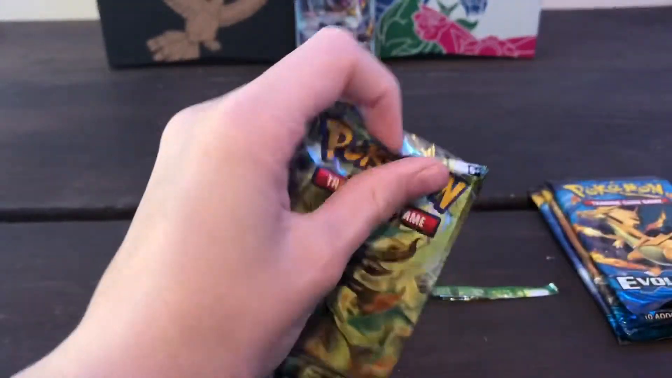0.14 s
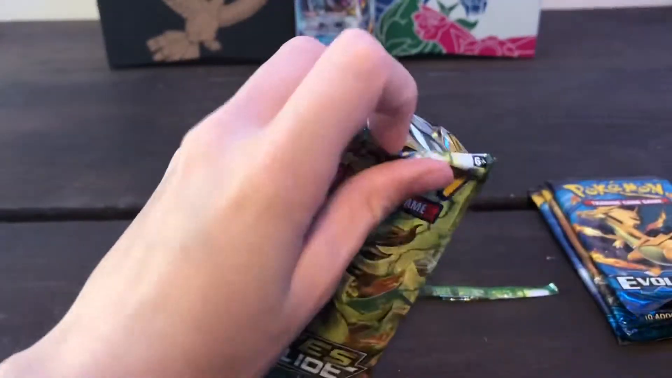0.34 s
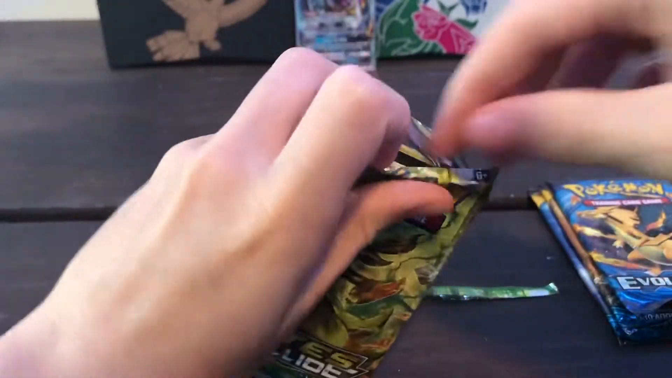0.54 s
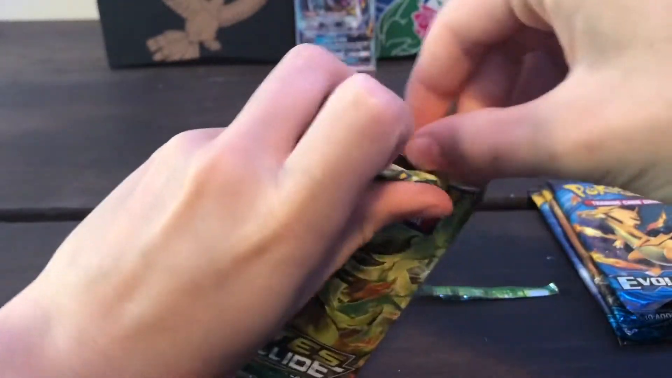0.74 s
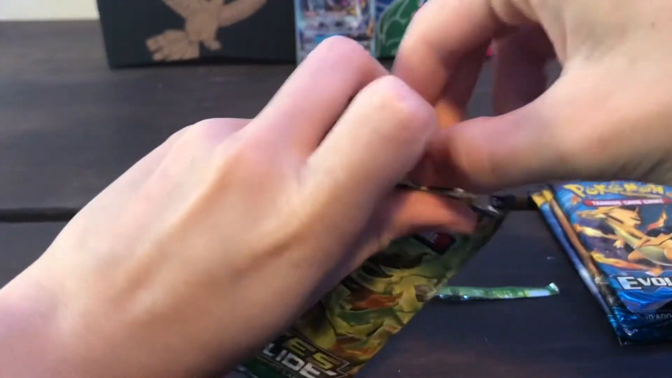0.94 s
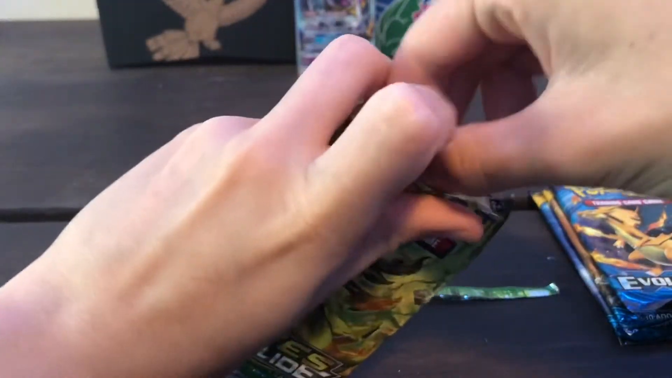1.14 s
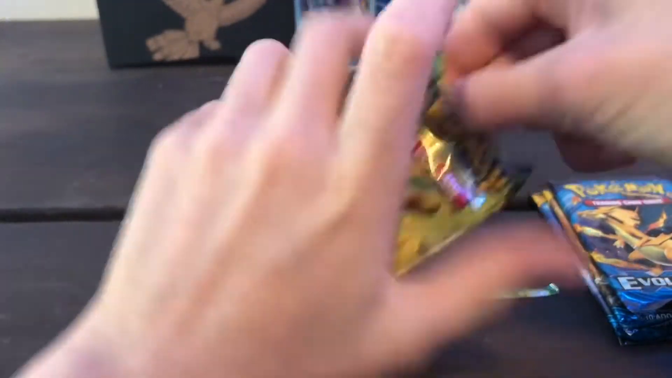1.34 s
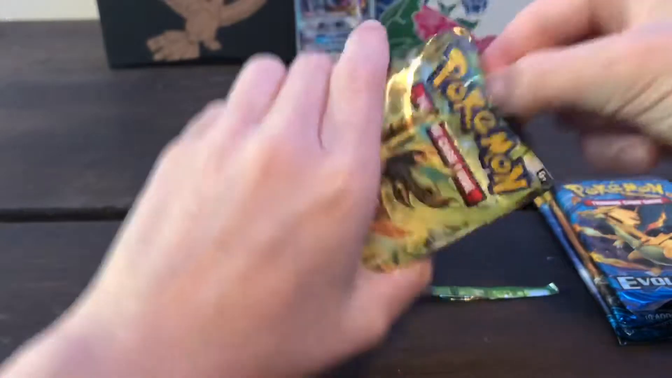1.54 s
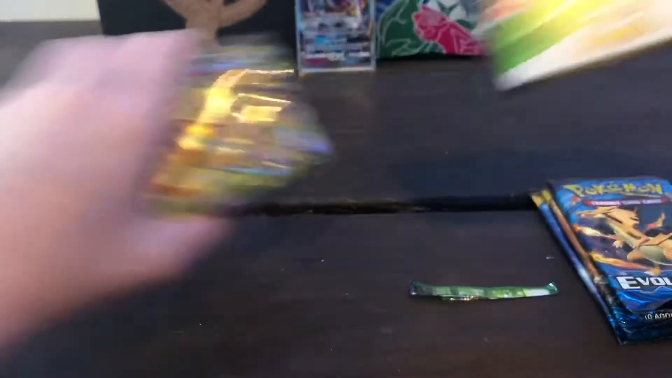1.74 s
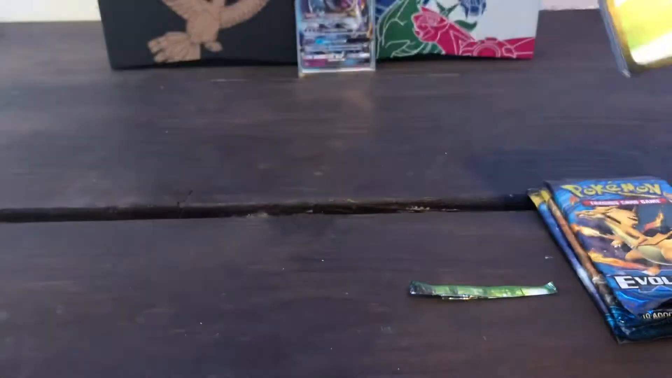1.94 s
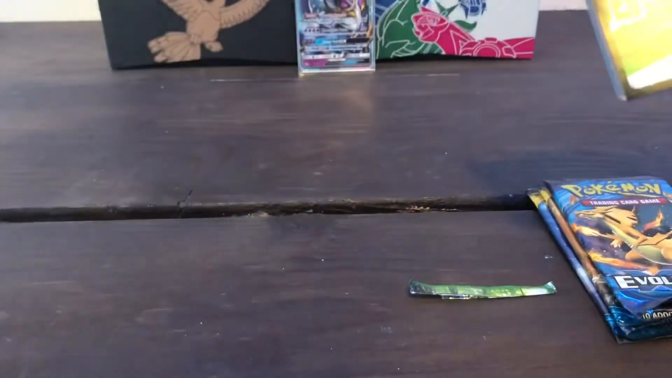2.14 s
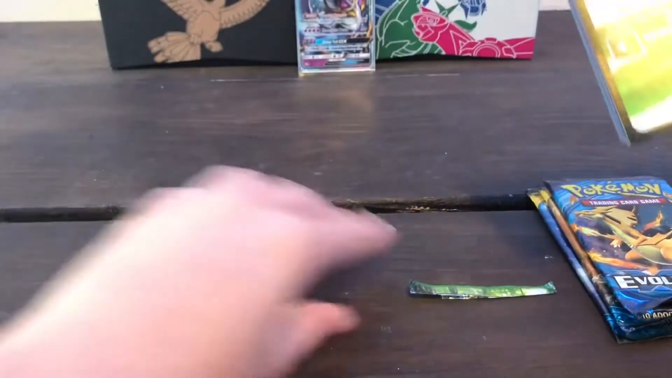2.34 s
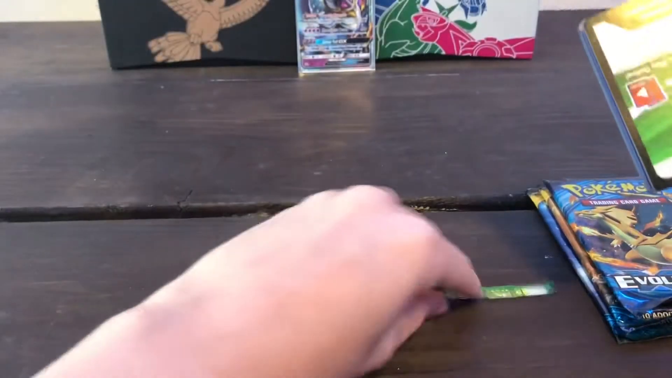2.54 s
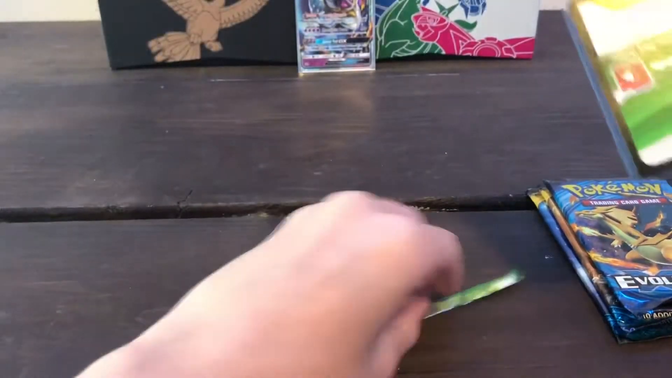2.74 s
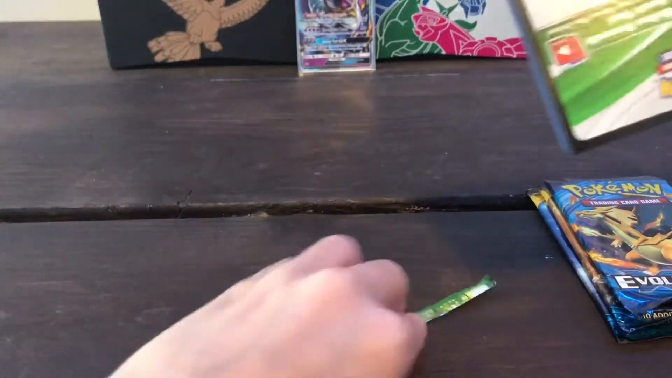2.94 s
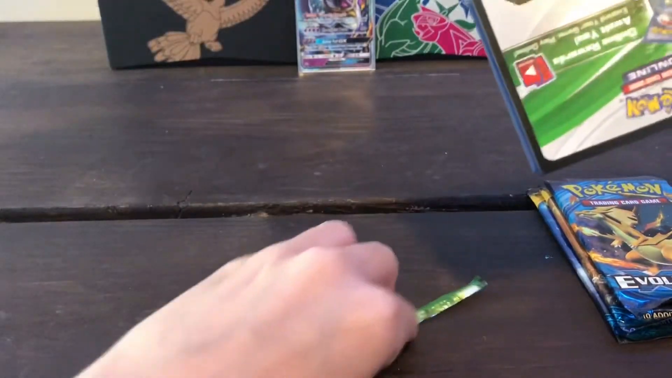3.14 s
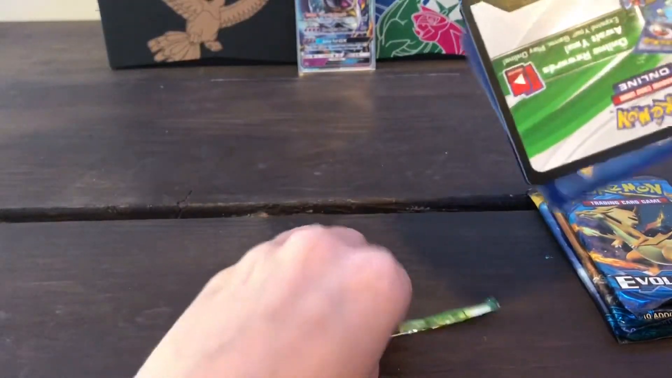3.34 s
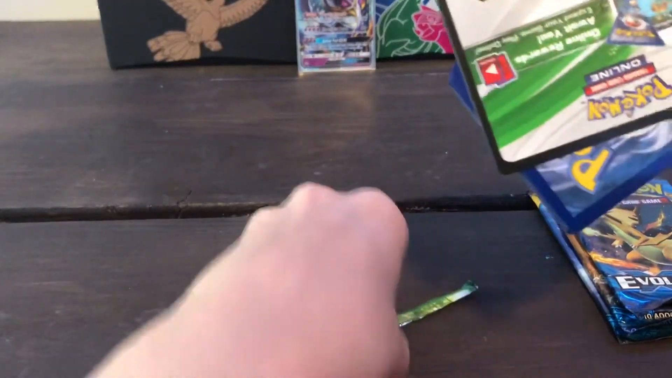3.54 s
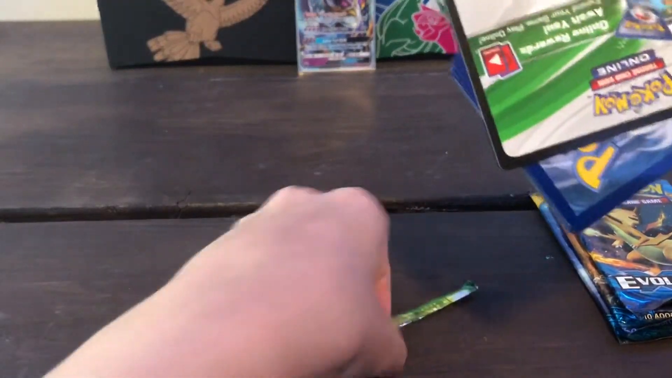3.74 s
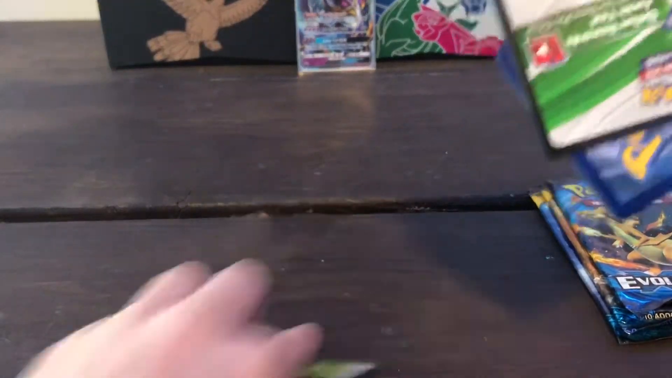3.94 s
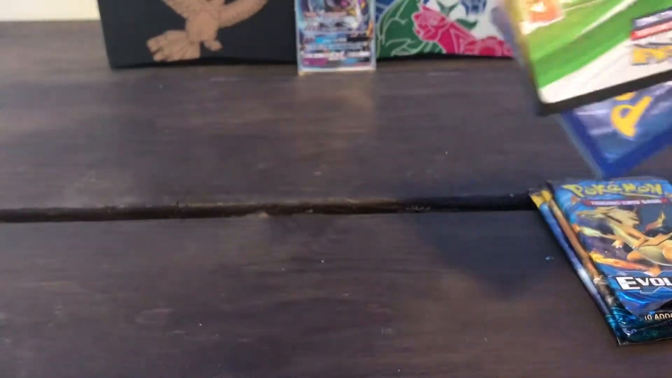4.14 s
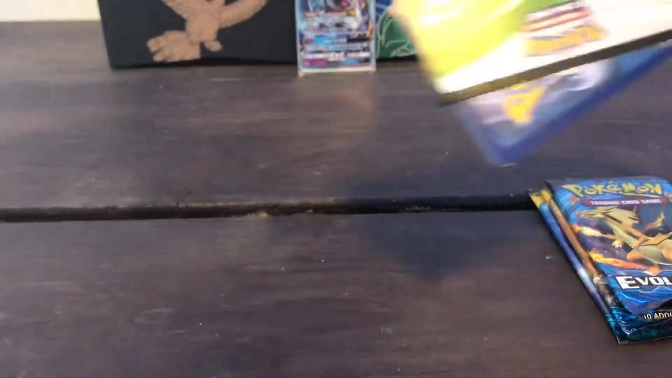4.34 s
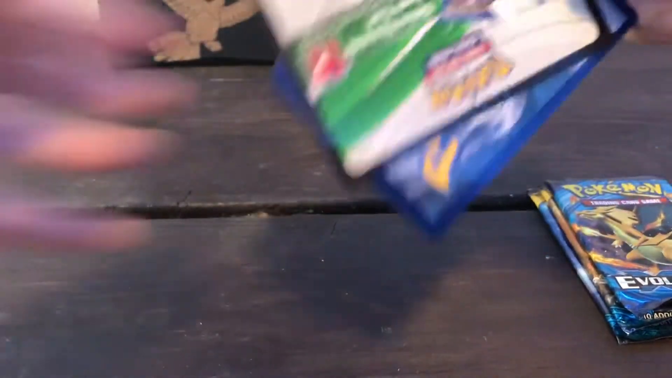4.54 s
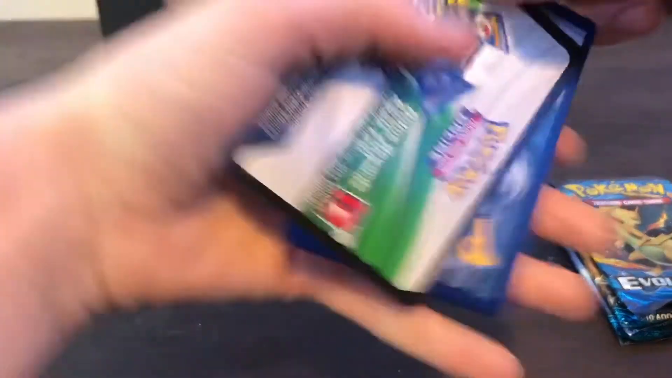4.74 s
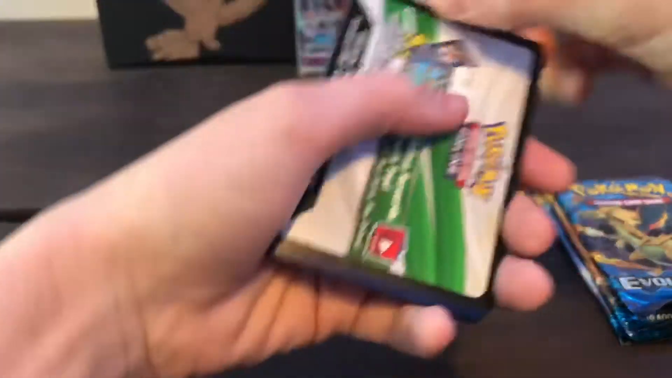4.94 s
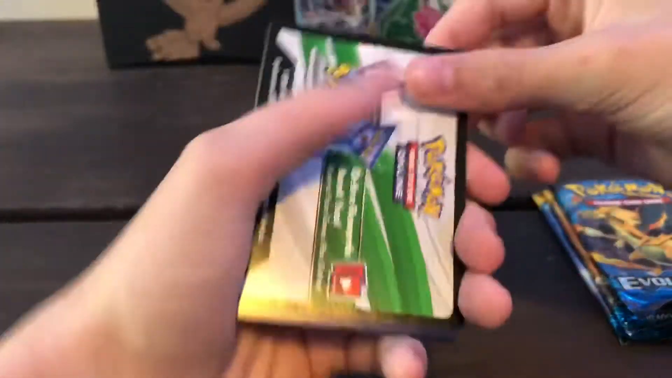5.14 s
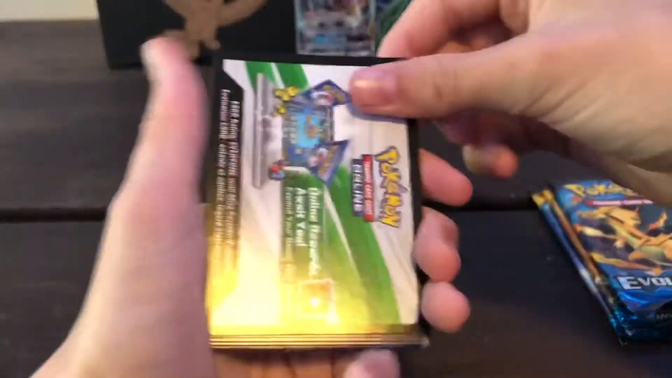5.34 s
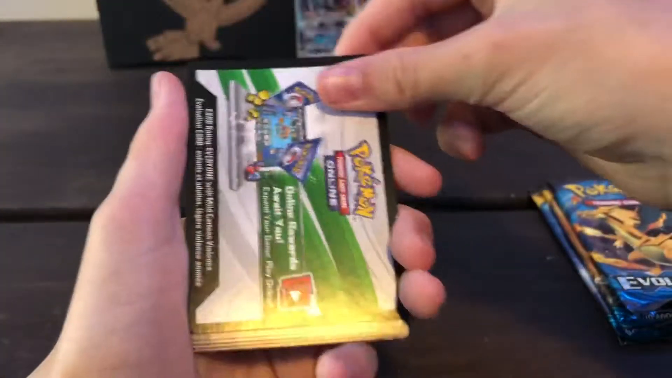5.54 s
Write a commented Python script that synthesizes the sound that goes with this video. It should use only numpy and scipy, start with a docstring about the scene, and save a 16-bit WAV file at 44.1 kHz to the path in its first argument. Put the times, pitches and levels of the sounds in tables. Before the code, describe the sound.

Hands crinkle and tear a crisp foil wrapper over a wooden table in sharp crackling bursts, then quieter rustles and small card slides.

```python
"""Foil wrapper torn over a table

Hands crinkle and tear a foil card wrapper over a wooden table in a quiet room, then handle strip and cards.
Creases snap one by one as short ringing noise bursts, over a rustle of tiny slips made of clicked grains.
Hands and cards knock and scrape the table, whose modes ring low; soft bumps shake the stand.
The loudest snaps clip the converter."""
import sys
import numpy as np
from scipy import signal
from scipy.fft import rfft, irfft
from scipy.io import wavfile
from scipy.ndimage import uniform_filter1d

SR = 44100
rng = np.random.default_rng(int(sys.argv[2]) if len(sys.argv) > 2 else 0)


def transcribe(signal):
    """Save signal, clipped to [-1, 1], as a 16-bit WAV file at the path in sys.argv[1]."""
    frames = np.atleast_2d(signal).T
    limited = np.clip(frames, -1, 1)
    pcm = np.round(limited * 32767).astype(np.int16)
    wavfile.write(sys.argv[1], SR, pcm)


def volts_from_decibels(level):
    """Turn decibel levels (scalar or array-like) into linear amplitude factors."""
    exponent = np.asarray(level, float) / 20
    return 10 ** exponent


N = 246078


def evened(x):
    """Scales each row to rms 1."""
    return x / np.sqrt(np.mean(x ** 2, -1, keepdims=True) + 1e-20)


def read(points, hz):
    """Reads a curve on a log-frequency axis."""
    f, value = np.transpose(points)
    return np.interp(np.log(hz + 1), np.log(f + 1), value)


def add(mix, s, sound):
    """Mixes a sound in at s seconds."""
    part = mix[max(round(s * SR), 0):][:len(sound)]
    part += sound[:len(part)]


def clicks(per_s, spread_db):
    """A random train of signed clicks; a few are large."""
    chance = rng.random(N)
    size = np.minimum(rng.exponential(1, N), 4.5)
    sign = rng.choice([-1., 1.], N)
    return volts_from_decibels(spread_db * size) * (chance < per_s / SR) * sign


def strokes(rows, linger=0):
    """Strokes rise to a peak and fall away: summed level [dB], then colours [dB] weighted by power."""
    stroke_db, bend = 20, 1.203  # drop over one rise or fall time; bend above 1: round top, firm stop
    s, db, rise_s, fall_s, *colours = np.transpose(rows)[:, :, None]
    t = np.arange(0, N + 64, 64) / SR
    before = (s - t) / np.maximum(rise_s, .003)
    after = (t - s) / np.maximum(fall_s, .003)
    under = np.where(t < s, before, after)
    drop_db = stroke_db * (1 - linger * (t > s)) * under ** bend
    power = volts_from_decibels(db - drop_db) ** 2 + 1e-12
    total = power.sum(0)
    curves = [10 * np.log10(total)] + [(power * c).sum(0) / total for c in colours]
    return [np.interp(np.arange(N) / SR, t, c) for c in curves]


# room tone spectrum: (frequency [Hz], relative density [dB per Hz])
AIR_SPECTRUM = [(18, -42), (30, 2), (165, -3.5), (233, -4), (345, -6), (404, -8.5), (866, -14.5),
                (1350, -18), (1460, -16), (1910, -21.5), (2680, -22.5), (3980, -24), (16000, -31)]
AIR_RMS_DB = -54


def air():
    """Room tone and microphone hiss: shaped noise that wavers slowly, most in the bass."""
    frames, hz = N // 256 + 5, np.fft.rfftfreq(1024, 1 / SR)
    real, imag, patches = rng.standard_normal((frames, 513, 3)).T
    patches = uniform_filter1d(patches, 8, 0)
    patches = evened(uniform_filter1d(patches, 14, 1))
    waver_db = .6 + 2.5 / (1 + hz / 300)
    level_db = read(AIR_SPECTRUM, hz)[:, None] + waver_db[:, None] * patches
    noise = signal.istft((real + 1j * imag) * volts_from_decibels(level_db), nperseg=1024, noverlap=768)[1]
    return volts_from_decibels(AIR_RMS_DB) * evened(noise[:N])


# reverberation: (frequency [Hz], t60 [s])
ROOM_T60 = [(250, 0.36), (660, 0.2), (1740, 0.35), (4590, 0.15), (12100, 0.25)]
# table top and boxes behind: (delay [s], level [dB])
EARLY_ECHOES = [(.0031, -20), (.0058, -23.5), (.0095, -26.5), (.014, -40)]


def room(x):
    """A few early echoes, plus sparse taps of random sign dying band by band."""
    taps = np.zeros(SR // 2)
    at = np.arange(300, len(taps) - 20, 20)
    taps[at + rng.integers(0, 20, len(at))] = rng.choice([-1., 1.], len(at))
    hz, t, z = signal.stft(taps, SR, nperseg=128)
    decay = volts_from_decibels(-60 * t / read(ROOM_T60, hz)[:, None])
    tail = signal.istft(z * decay, SR, nperseg=128)[1]
    tail *= volts_from_decibels(-18) / np.linalg.norm(tail)
    for s, db in EARLY_ECHOES:
        add(tail, s, volts_from_decibels(np.array([db])))
    return signal.oaconvolve(x, tail)[:N]


# wrists and arms shaking the stand: (time [s], relative level [dB])
BUMPS = [(0.192, -40), (1.13, -49), (1.421, -53), (1.531, -53.5), (1.661, -41), (1.767, -35), (2.512, -43),
         (2.594, -57), (2.821, -49), (3.55, -48), (4.111, -41), (4.727, -47), (5.232, -52)]


def thuds():
    """Soft bumps: a couple of slow cycles that swell, sag in pitch and fade."""
    out, t = np.zeros(N), np.arange(SR // 8) / SR
    swell_s = .013
    for (s, db), (bend, phase) in zip(BUMPS, rng.random((len(BUMPS), 2))):
        turns = (70 + 25 * bend) * t * (1 - 4.4 * t)
        swell = t / swell_s * np.exp(1 - t / swell_s)
        add(out, s - .017, volts_from_decibels(db + 7.0) * swell * np.sin(2 * np.pi * (turns + phase)))
    return out


# modes of the wooden top: (frequency [Hz], relative level [dB], t60 [s])
TABLE_MODES = [(104.5, -10.5, 0.41), (139.5, -1, 0.28), (235, -2, 0.11), (187.5, -7, 0.082),
               (265.4, -4, 0.13), (291, -1.5, 0.069), (361.6, -4, .09), (398, -6.5, 0.091),
               (437.3, -1.5, 0.12), (488, -7.5, 0.24), (541.6, -5, 0.12), (612, -8.5, 0.11),
               (706, -13, 0.15), (800, -1.5, 0.079), (880, -7.5, 0.049), (973, -5.5, 0.093),
               (1086, -11, 0.14), (1170, -12, 0.073), (1329, -11, 0.08)]
# hands and cards meeting the table:
# (time [s], relative level [dB], upper modes over lower [dB], mode nearest the spot [Hz])
TABLE_KNOCKS = [(0.003, -24.5, 29.5, 1080), (0.127, -11, 8.5, 700), (0.139, -12, -6, 235),
                (0.195, -17, 11, 440), (0.205, -15, -3, 790), (0.769, -38, 24, 850), (1.058, -28, 15, 1170),
                (1.157, -25.5, 21, 800), (1.481, -27.5, 4, 880), (1.615, -20.5, -22, 1180),
                (1.633, -22.5, -3, 845), (1.707, -26.5, -1, 468), (2.007, -26, 11, 974),
                (2.051, -21, 18, 1020), (2.069, -25, 20.5, 1130), (2.306, -27.5, 0.5, 263),
                (2.509, -28.5, -10, 290), (2.897, -34, -2, 291), (3.02, -44.5, 12.5, 973),
                (3.472, -28, 2.5, 960), (3.536, -23.5, 0, 259), (4.044, -31, -23, 290),
                (4.094, -29.5, -21, 238.4), (4.104, -30, -28, 120), (4.707, -28.5, -4, 226)]
# hands sliding and leaning on the table:
# (peak time [s], relative level [dB], rise [s], fall [s], deepest modes over the rest [dB])
TABLE_SLIDES = [(0, -18.5, .01, 0.13, 11), (.138, -18, .03, .15, -24), (.206, -19, 0.13, 0.13, 14),
                (.449, -27.5, .013, 0.012, 1), (.549, -40, .04, 0.32, -5), (.892, -39.5, 0.59, 0.054, -11),
                (1.006, -38.5, .02, 0.22, -24), (1.16, -32, .1, 0.11, -43),
                (1.225, -32.5, 0.092, 0.033, -32), (1.317, -52, .055, 0.052, -17),
                (1.483, -38, .05, .4, -27), (1.616, -22.5, .09, 0.028, -5), (1.74, -40.5, .08, 0.71, -1),
                (1.91, -44, .2, 0.042, -7), (2.011, -49, .028, 0.043, 11),
                (2.072, -25.5, 0.061, 0.081, -23), (2.313, -36, 0.017, 0.6, -3.5),
                (2.524, -41.5, 0.11, 0.08, -1), (2.78, -39, 0.12, 0.23, -2), (2.899, -40.5, .03, 0.067, -9),
                (3.064, -33.5, 0.071, 0.095, 2.5), (3.259, -38.5, 0.16, 0.081, -1),
                (3.412, -39, 0.022, 0.39, 11), (3.542, -38, 0.096, 0.049, 11),
                (3.777, -36, 0.092, 0.2, -8.5), (4.101, -39.5, 0.2, .09, 1.3),
                (4.712, -44, 0.026, 0.016, -20), (4.873, -42, 0.046, .016, -20.5),
                (5.005, -50, 0.11, 0.045, 5)]


def table():
    """Soft knocks and a gritty scrape drive the same modes of the wooden top."""
    t, out = np.arange(SR // 2) / SR, np.zeros(N)
    scrape_db, deep_db = strokes(TABLE_SLIDES)
    spot = rng.standard_normal((len(TABLE_KNOCKS), len(TABLE_MODES)))  # each blow lands elsewhere
    flesh = signal.windows.hann(22)  # skin spreads the contact over half a millisecond
    for k, (hz, db, t60) in enumerate(TABLE_MODES):
        mode = volts_from_decibels(db - 60 * t / t60) * np.sin(2 * np.pi * hz * t)
        upper = 1 / (1 + (600 / hz) ** 4)
        deep = 1 / (1 + (hz / 180) ** 6)
        drive = volts_from_decibels(scrape_db + deep * deep_db - 36.0) * evened(clicks(700, spread_db=2))
        side = (-1) ** k  # neighbouring modes start in opposite directions
        for (at, blow_db, upper_db, spot_hz), luck in zip(TABLE_KNOCKS, spot[:, k]):
            near_db = 9 * np.exp(-(np.log(hz / spot_hz) / .09) ** 2)
            tilt_db = 1.38 * upper * upper_db - 0.65 * max(upper_db, 0)
            strength = volts_from_decibels(blow_db + near_db - 10 + tilt_db + 2.9 * luck)
            add(drive, at - .0015, side * strength * flesh / flesh.sum())
        out += signal.oaconvolve(drive, mode)[:N]
    # little sounds below the lowest mode
    return signal.sosfilt(signal.butter(2, 95, "high", fs=SR, output="sos"), out)


# fingers rubbing foil and card: (peak time [s], relative level [dB], rise [s], fall [s],
# treble over middle [dB], low over middle [dB])
FINGER_RUBS = [(0, -25.5, 0.011, 0.079, -5, 0), (.11, -25.5, 0.12, 0.1, -3, -16),
               (.15, -27, 0.058, 0.12, -5.5, 10.5), (.32, -58, .15, 0.19, 4, 2),
               (.453, -38.5, 0.019, 0.092, 1, -21), (.527, -35, 0.034, 0.097, -6, -5),
               (.63, -37, 0.074, 0.13, -2, 0.5), (.746, -33, 0.18, 0.3, -9.5, -9),
               (.905, -37, 0.21, 0.23, -10, -6), (1.07, -30.5, 0.054, 0.29, -3, -2.5),
               (1.165, -16, 0.037, 0.054, -7.5, -5), (1.231, -34.5, 0.042, 0.099, 4, -9),
               (1.327, -25.5, 0.012, 0.085, -5, -1.5), (1.503, -25, 0.099, 0.1, 0.5, -5.5),
               (1.58, -25.5, 0.04, 0.12, 6, -1), (1.635, -25.5, 0.13, 0.032, 2.5, -2),
               (1.72, -37.5, .04, 0.26, -5, 1), (1.924, -34.5, .1, 0.099, -14, -5.5),
               (2.015, -32, 0.013, 0.053, -3, 2), (2.06, -37, 0.038, 0.096, -8.5, 4),
               (2.306, -48, .006, 0.19, -10.5, 10), (2.522, -42, .05, 0.047, -5.5, -2.5),
               (2.6, -56.5, 0.1, .08, 0, 5), (2.681, -36, 0.036, .05, -1.5, -3),
               (2.77, -36.5, .04, 0.095, 2, 1), (2.8, -33.5, 0.06, 0.018, 3, -15),
               (2.84, -50, .04, 0.22, 9, 9), (3.095, -37.5, 0.077, 0.044, -11.5, -6.5),
               (3.22, -39, 0.024, 0.063, 2.1, -0.5), (3.34, -52.5, 0.098, 0.22, -3, 3),
               (3.476, -53.5, 0.023, 0.043, -19, 26), (3.53, -46, 0.035, 0.052, -12, 10.5),
               (3.68, -62, .05, .05, -7, 9.5), (3.77, -39.5, 0.045, 0.19, 1.5, -2.5),
               (3.85, -40.5, 0.16, 0.13, 2.1, -2.5), (3.965, -22.5, 0.082, .09, 8.5, -3),
               (4.035, -29, .07, 0.13, 10, -1), (4.099, -30, 0.044, 0.075, -9, -19),
               (4.657, -38.5, 0.021, 0.036, -6.5, -6), (4.708, -31.5, 0.013, 0.054, -12, -2),
               (4.745, -27, 0.042, 0.037, 1, -15.5), (4.89, -55, 0.14, 0.038, -4, -3),
               (5.03, -52, 0.042, 0.029, -3.5, -12), (5.32, -65.5, 0.24, .05, -2.5, -9.5),
               (5.55, -47, 0.025, 0.14, 3, 2)]
# wrapper: (frequency [Hz], relative density [dB per Hz])
FOIL_SPECTRUM = [(290, -36), (500, -23.5), (795, -3), (1460, -9), (1770, -1), (1930, -15), (2160, -3),
                 (4150, -9.5), (4530, -3), (16000, -16)]
# torn strip dragged over wood: (frequency [Hz], relative density [dB per Hz])
STRIP_SPECTRUM = [(290, -55), (500, -44), (1020, -18.5), (1840, -10.5), (2070, -14.5), (3650, -9),
                  (5390, -6), (9630, -13), (15100, -9), (16000, 0)]
# glossy cards sliding on each other: (frequency [Hz], relative density [dB per Hz])
CARDS_SPECTRUM = [(290, -57), (500, -31.5), (1480, -12.5), (1720, -20.5), (2540, -4), (3750, -9.5),
                  (5240, -2.5), (8700, -10), (11300, -9), (16000, -5)]
STRIP_FROM_S, CARDS_FROM_S = 2.28, 4.4
RUSTLE_HZ = (1310, 4262, 10900)  # centres of low, middle and treble


def rustle():
    """Thousands of tiny slips a second, each a few cycles at its own pitch, coming in clumps."""
    treble_hurry, low_linger = .25, .2  # shares of the fall: treble drops faster, lows slower
    t = np.arange(N) / SR
    rub_db, treble_db, low_db = strokes(FINGER_RUBS)
    treble_db = treble_db + strokes(FINGER_RUBS, -treble_hurry)[0] - rub_db
    low_db = low_db + strokes(FINGER_RUBS, low_linger)[0] - rub_db
    held = np.searchsorted([STRIP_FROM_S, CARDS_FROM_S], t)  # which thing is in the hands
    clump = volts_from_decibels(2.5 * evened(uniform_filter1d(rng.standard_normal(N), 130)))  # slips set each other off
    out = np.zeros(N)
    for hz in np.geomspace(600, 15600, num=40):
        place = np.interp(np.log(hz), np.log(RUSTLE_HZ), [-1, 0, 1])
        lean_db = place * treble_db if place > 0 else -place * low_db
        colour_db = []
        for thing in (FOIL_SPECTRUM, STRIP_SPECTRUM, CARDS_SPECTRUM):
            trend_db = np.interp(place, [-1, 0, 1], read(thing, np.array(RUSTLE_HZ)))
            colour_db.append(read(thing, hz) - trend_db)
        turns = np.arange(int(30 * SR / hz)) * hz / SR
        grain = np.sin(2 * np.pi * turns) * turns * np.exp(-turns / 2.8)
        train = clicks(.15 * hz * clump / clump.mean(), spread_db=2.5)
        slips = evened(signal.oaconvolve(train, grain)[:N])
        width_db = 1.78 * np.log2(hz / 4500)  # higher grains span more Hz
        out += volts_from_decibels(rub_db + lean_db + np.array(colour_db)[held] + width_db - 14.5) * slips
    return out


def small_creases():
    """Random rows like the listed snaps, with level and treble following the rubbing at that moment."""
    count, over_rub_db, spread_db, mean_t60_s = 170, 6, 2.5, .008
    rub_db, treble_db, _ = strokes(FINGER_RUBS)
    when, size, pitch, length = rng.random((count, 4)).T
    at = (when * CARDS_FROM_S * SR).astype(int)
    db = rub_db[at] + over_rub_db - spread_db * np.log(1 - size)
    return list(zip(at / SR, db, 1000 * 9 ** pitch, treble_db[at], mean_t60_s * (.5 + length)))


# single creases popping, loud ones and faint ones that stand alone:
# (time [s], relative level [dB], ring [Hz], treble over middle [dB], t60 before limits [s])
SNAPS = [(.0047, -9, 5980, -10, 0.0092), (.06, -18.5, 880, -15, 0.0032), (.1096, -30, 4700, -5, .006),
         (0.134, -15.5, 1350, -20, 0.023), (.156, -12, 2120, 0, .004), (.1746, 5.5, 10100, 3, 0.0035),
         (.205, -7.5, 890, 3.5, 0.0046), (.257, -29, 2500, 0, .006), (.3, -30, 5050, -4, 0.0065),
         (0.3596, -16.5, 2750, -9.5, .008), (.445, 1, 7680, -4, 0.0054), (.5176, -4.5, 7430, -10, 0.0056),
         (0.5442, -15.5, 1274, -16, 0.012), (0.5559, -8.5, 3180, 9, 0.0018),
         (0.6253, -9, 3160, -0.5, 0.0057), (0.6426, -5, 9700, 2, 0.0046), (0.68, -11, 2640, -5.5, 0.005),
         (.716, -19.5, 5230, -2, 0.0099), (0.7386, -17.5, 2560, -10, 0.01), (.754, -19, 5000, 7, 0.0088),
         (0.7688, -16, 1000, -19, 0.0084), (.778, -9.5, 4170, -9.5, 0.0033), (.882, -17, 2620, -10, 0.0083),
         (0.8867, -17.5, 6360, -16, 0.015), (0.8944, -17.5, 4980, -10, 0.018),
         (.9364, -17.5, 6850, -7, 0.0064), (0.9473, -22, 1740, -20, .007),
         (1.0016, -21.5, 1200, -11, 0.024), (1.0112, -8, 2650, -34, .008), (1.0387, -22, 4700, -6, 0.018),
         (1.0446, -17.5, 4690, 2, 0.0052), (1.055, -2, 5640, -7, 0.0058), (1.059, -7.5, 1970, -6.5, 0.01),
         (1.1134, -9, 6550, -4, 0.005), (1.13, -2.5, 14900, -8.5, 0.0095), (1.196, -8, 4300, -6, 0.0071),
         (1.204, -14, 9800, -7, 0.0087), (1.2225, -0.5, 15200, 4, .012), (1.3151, 2.5, 2680, -1.5, 0.0064),
         (1.3319, 1, 3270, -7.5, 0.0086), (1.3388, -5, 2500, -3.5, 0.0082), (1.3942, -22, 2500, 10, 0.0091),
         (1.438, -10, 2310, -18, 0.0025), (1.4786, -1, 5950, -8.5, 0.0075), (1.4946, -7.5, 10100, 2, 0.005),
         (1.498, -1.5, 5800, -1, 0.0053), (1.5043, -4.5, 5820, 2, 0.017), (1.5241, -9, 2400, -9, 0.007),
         (1.5302, -16, 3070, -1, 0.017), (1.5468, -8.5, 7450, 4, .004), (1.5671, -19.5, 5230, -6, 0.013),
         (1.632, -11.5, 2230, -2, 0.015), (1.637, -6, 8430, -6.5, 0.015), (1.6489, -5.5, 8400, -3, .005),
         (1.6752, -15.5, 3950, -13, 0.0068), (1.7028, -14, 4440, -10, 0.012), (1.713, -20, 5230, -8, 0.015),
         (1.7755, -15, 5050, -4.5, 0.0044), (1.8232, -28.5, 4000, -13, 0.022),
         (1.8626, -24.5, 4010, -15, 0.015), (1.8777, -16, 5350, -10, 0.0061),
         (1.9144, -7.5, 2900, -10, 0.0048), (2.0062, -7, 920, -11, 0.0028),
         (2.0123, -9.5, 880, -13, 0.0027), (2.049, -15.5, 950, -2.5, 0.0068),
         (2.499, -23, 14600, 19.5, .005), (2.517, -20, 14100, 6, 0.0048), (2.5293, -20, 15200, 26, .007),
         (2.585, -29, 13100, -6, 0.0095), (2.76, -19, 13050, 10, 0.0033), (2.7746, -8, 9000, 11, 0.0026),
         (2.78, -11, 8900, 12.5, 0.0016), (2.7962, -15, 14510, 6, 0.0024),
         (2.822, -13.5, 13100, 4.5, 0.019), (2.832, -15, 12900, 12, 0.011), (2.893, -34, 11900, -6, 0.0072),
         (3.129, -28, 6360, 3, 0.011), (3.1335, -20, 6700, 5, 0.0015), (3.3329, -21.5, 12400, 5.5, 0.0066),
         (3.4049, -37, 15120, 13, .009), (3.4744, -36.5, 1580, -3, 0.029), (3.4874, -32.5, 1630, -26, .007),
         (3.516, -35.5, 1980, -8, 0.017), (4.0996, -8.5, 4700, -3, 0.0041), (4.11, -32, 4480, 10, 0.0064),
         (4.8498, -39.5, 8800, -13.5, 0.0061)]


def snaps():
    """Each crease is a burst that starts at once, rings round one frequency and dies in milliseconds."""
    out, hz, t = np.zeros(N), np.fft.rfftfreq(2048, 1 / SR), np.arange(2048) / SR
    rows = small_creases() + SNAPS
    noise = rng.standard_normal((len(rows), 2048))
    for (s, db, ring_hz, treble_db, t60), burst in zip(rows, noise):
        # lows are weaker for high rings and hard pops
        low_db = -3.5 - 0.5 * np.log2(ring_hz / 4000) - 0.36 * (db + 11.5)
        slope_db = read([(250, low_db + 0.5), (1300, low_db), (4500, 0.0093), (11500, treble_db)], hz)
        broad = volts_from_decibels(0.5) / (1 + ((hz - ring_hz) / (250 + 0.088 * ring_hz)) ** 2)
        burst = evened(irfft(rfft(burst) * volts_from_decibels(slope_db) * (1 + broad)))
        # dull creases ring more purely
        ring = volts_from_decibels(-4.5 - 0.41 * treble_db) * np.sin(2 * np.pi * ring_hz * t)
        t60 = np.clip(t60, .002, .04)
        shape = (1 - np.exp(-t / (0.062 * t60))) * volts_from_decibels(-60 * t / t60)
        snap = evened((burst + ring) * shape) * np.sqrt(np.mean(shape ** 2))
        add(out, s - .0003, volts_from_decibels(db + 6.5) * snap)
    # the creases carry no deep bass
    return signal.sosfilt(signal.butter(2, 280, "high", fs=SR, output="sos"), out)


def scene():
    """Foil and table, the room round them, the bumps and the room tone."""
    near = snaps() + rustle() + table()
    return (near + room(near) + thuds() + air())[None]


def roll_off(x):
    """The treble ends steeply here."""
    return signal.sosfilt(signal.butter(12, 17040, fs=SR, output="sos"), x)


def record(dry):
    """A small microphone loses the deepest bass and the top; the converter clips."""
    edge_hz = 15850
    dry = signal.sosfilt(signal.butter(3, 55, "high", fs=SR, output="sos"), dry)
    lowpass = signal.firwin(301, edge_hz, window=("kaiser", 9), fs=SR)
    dry = signal.oaconvolve(dry, lowpass[None], "same")
    return roll_off(np.clip(dry, -.99, .99))


dry = scene()
out = record(dry)
transcribe(out)
```